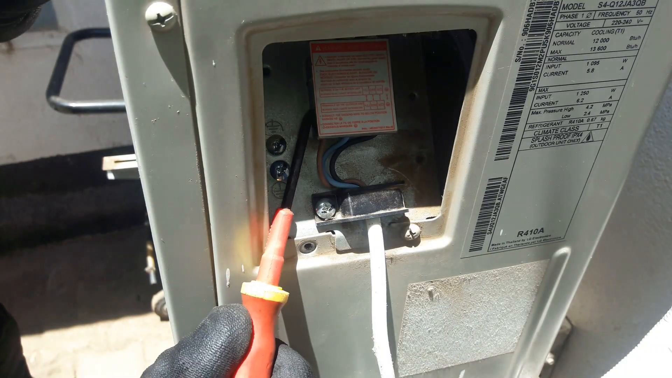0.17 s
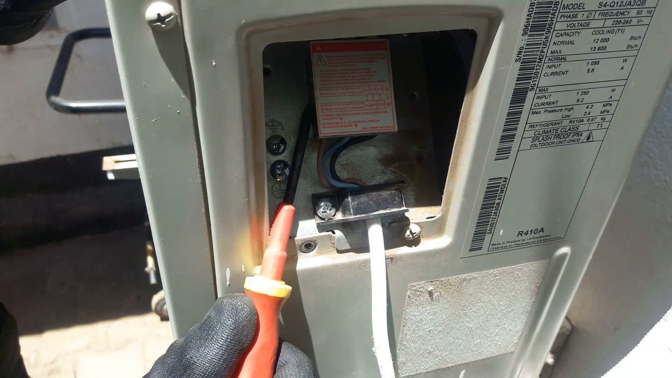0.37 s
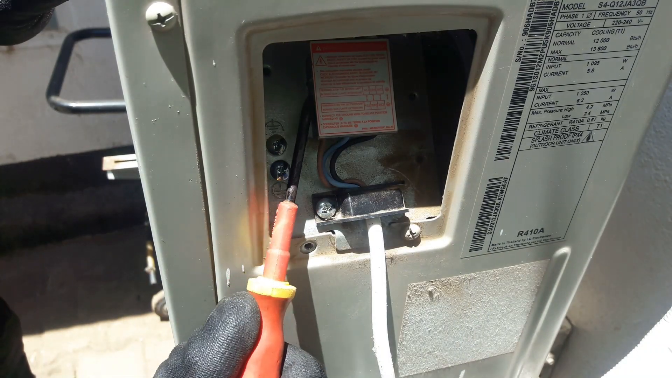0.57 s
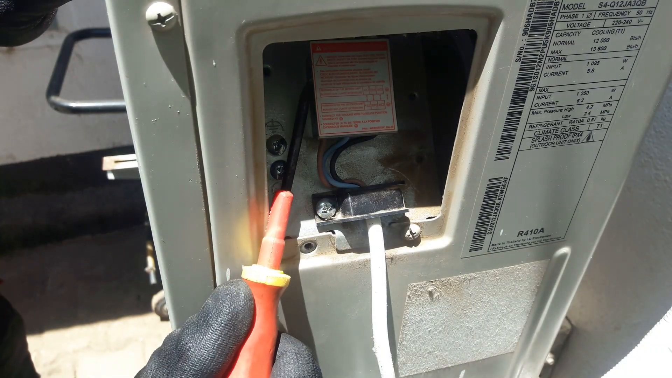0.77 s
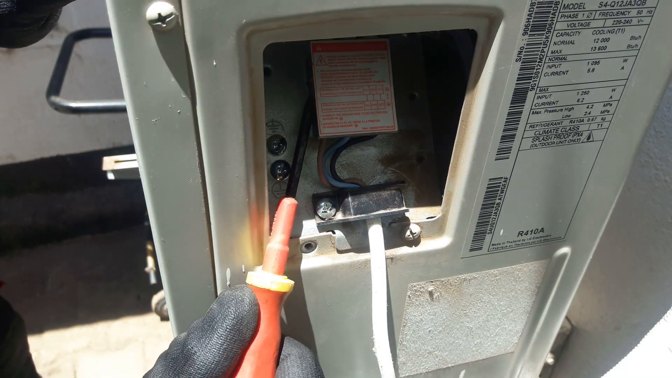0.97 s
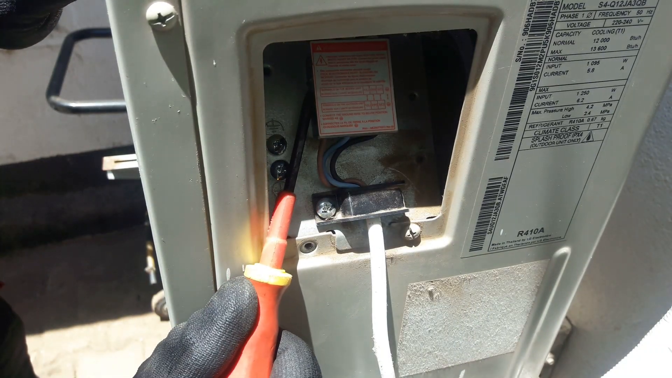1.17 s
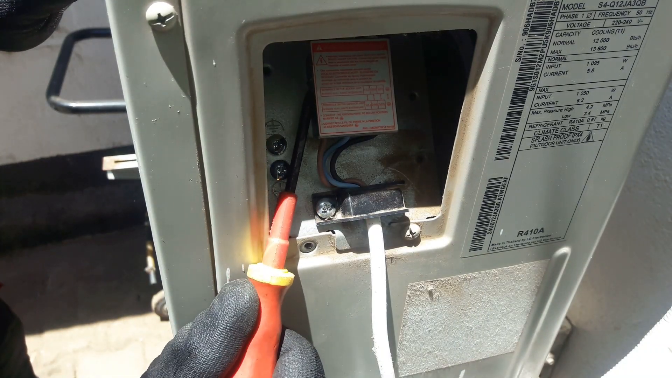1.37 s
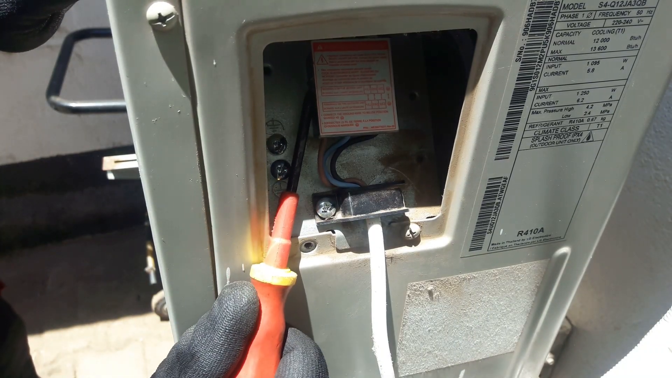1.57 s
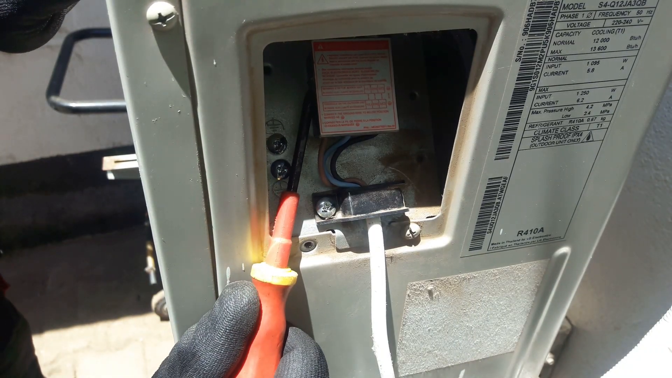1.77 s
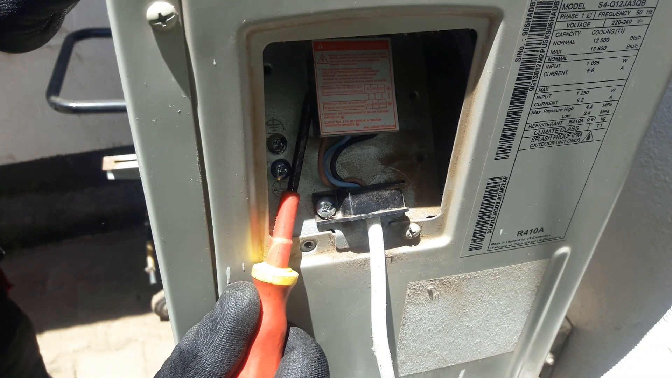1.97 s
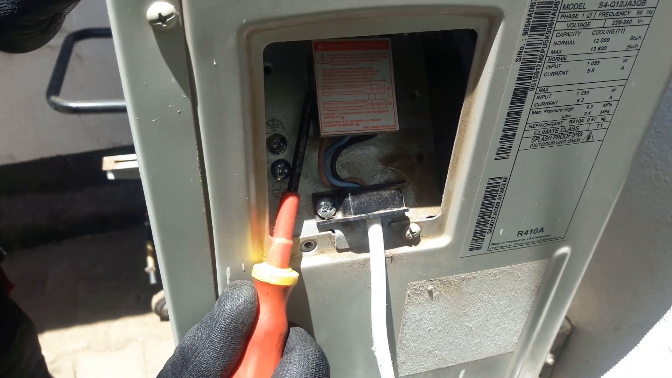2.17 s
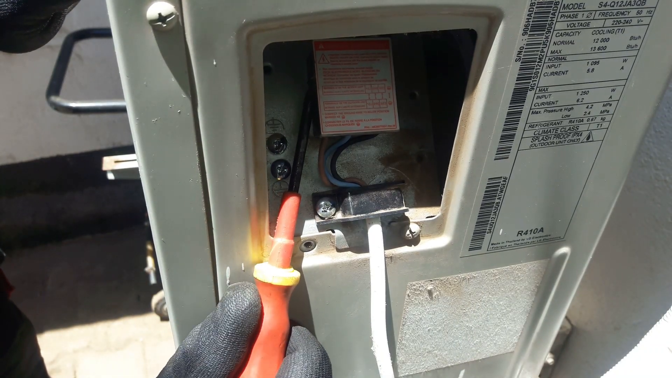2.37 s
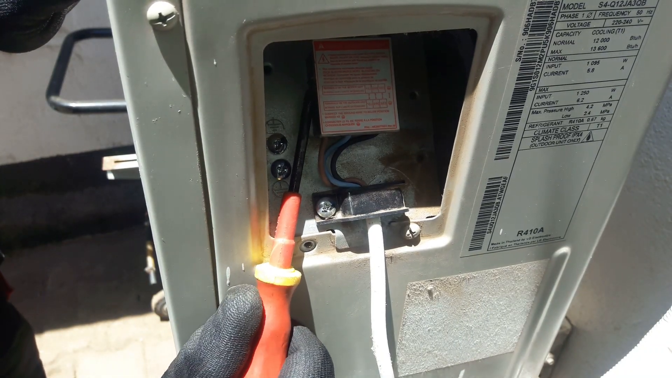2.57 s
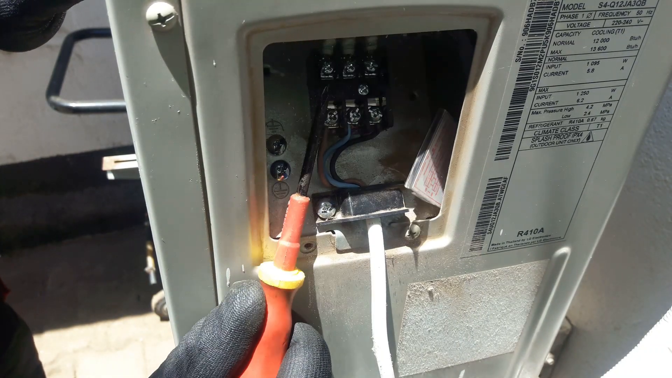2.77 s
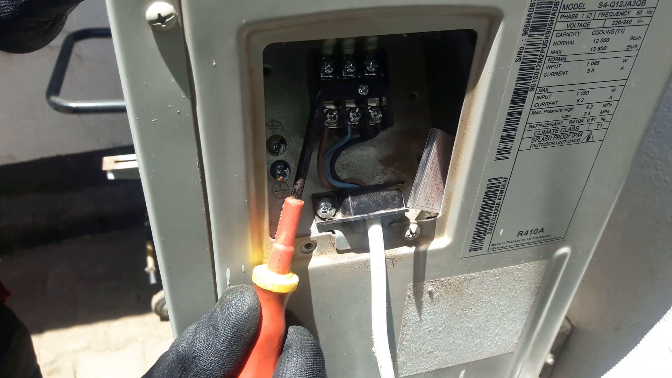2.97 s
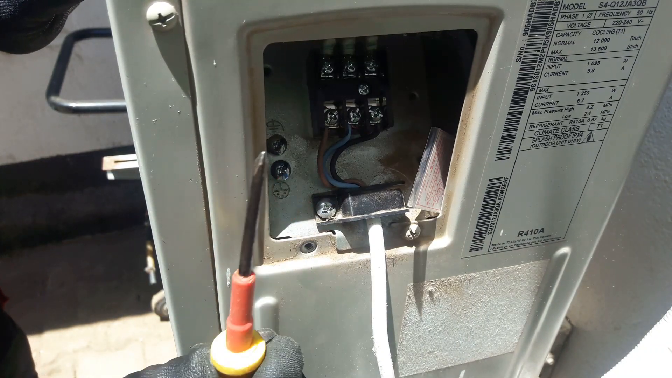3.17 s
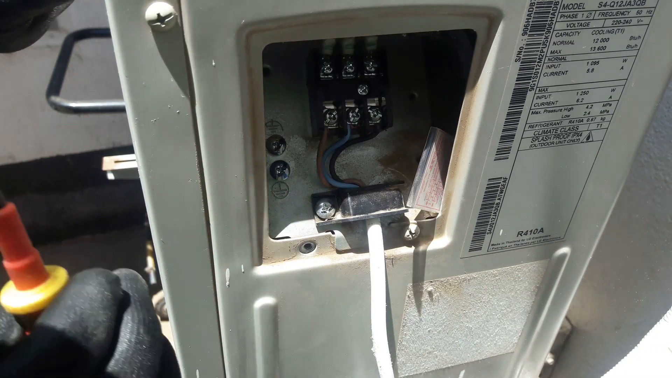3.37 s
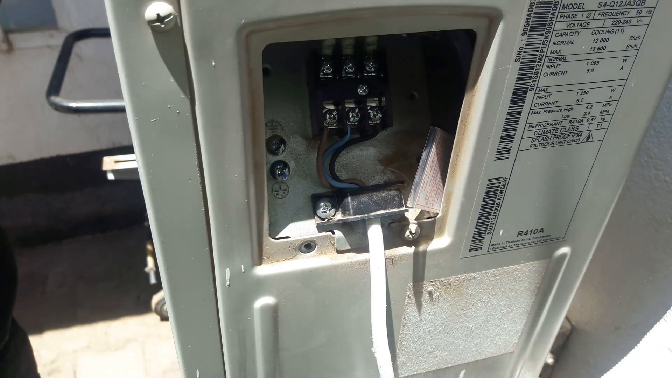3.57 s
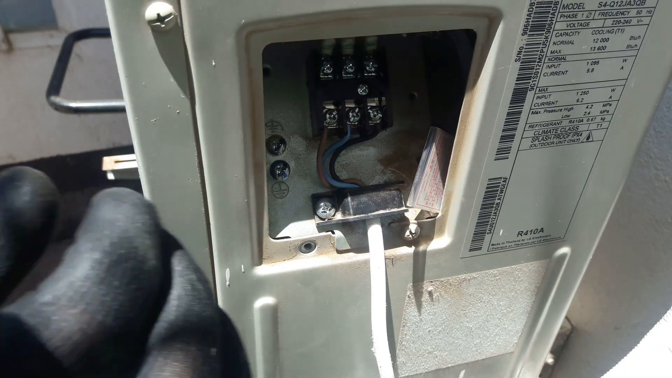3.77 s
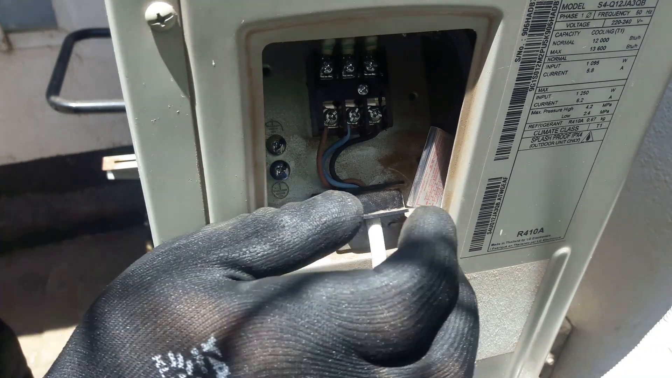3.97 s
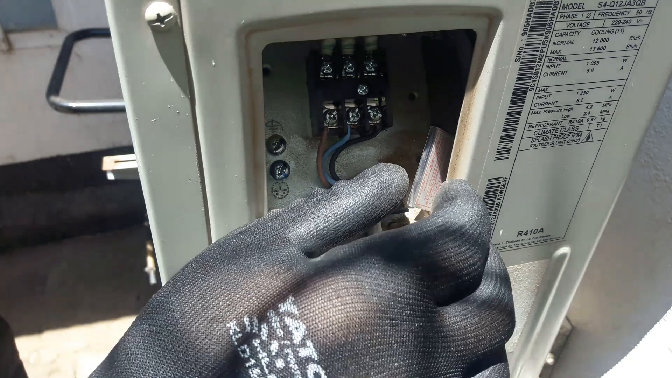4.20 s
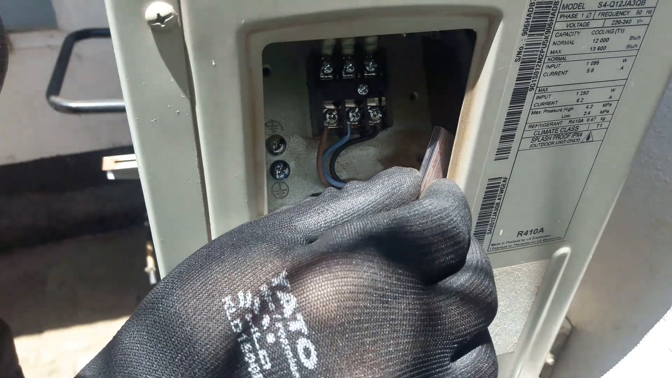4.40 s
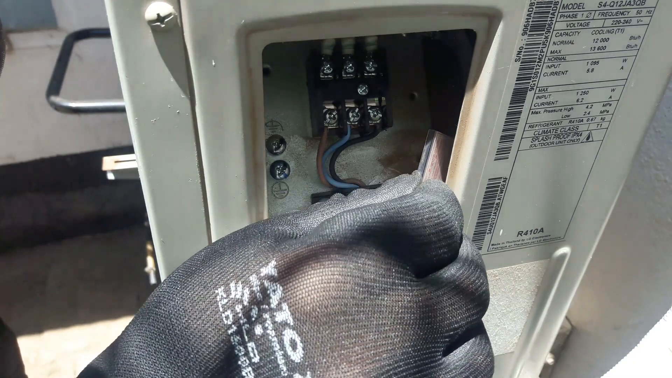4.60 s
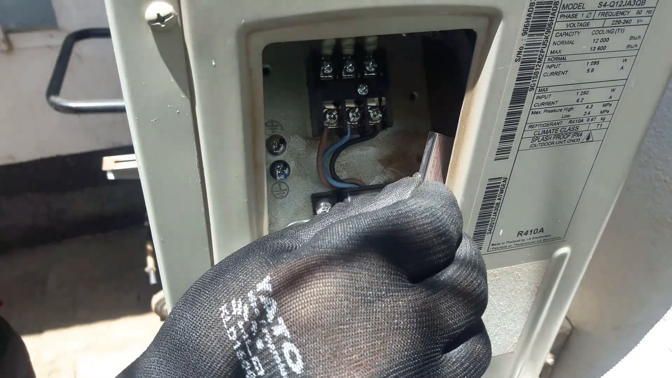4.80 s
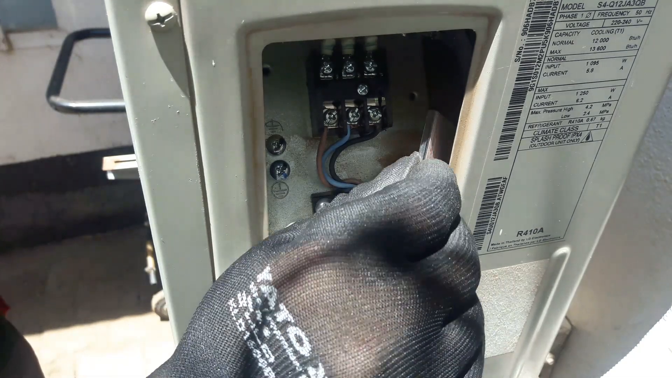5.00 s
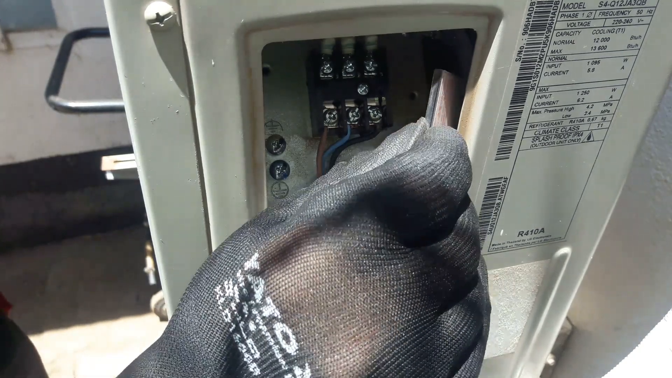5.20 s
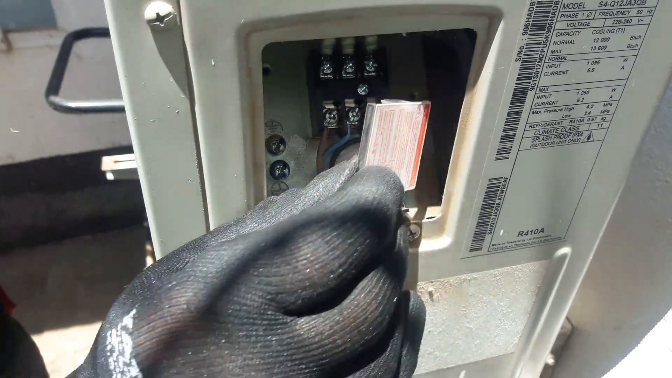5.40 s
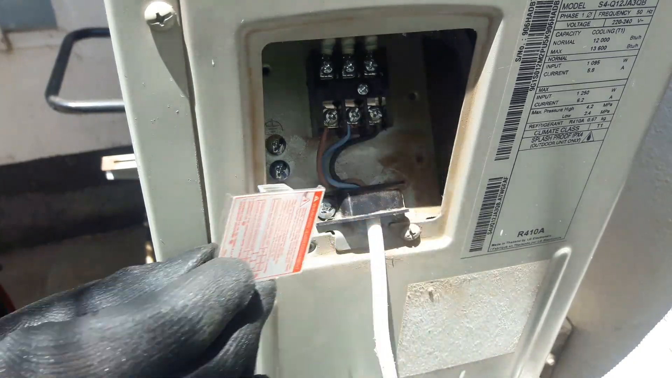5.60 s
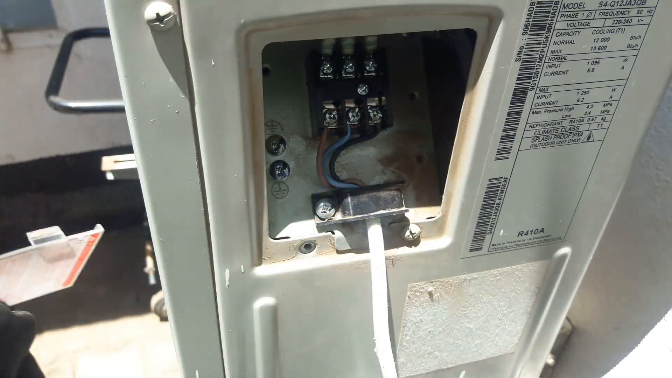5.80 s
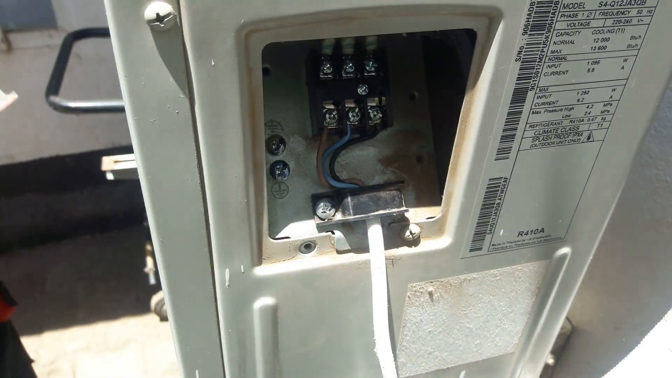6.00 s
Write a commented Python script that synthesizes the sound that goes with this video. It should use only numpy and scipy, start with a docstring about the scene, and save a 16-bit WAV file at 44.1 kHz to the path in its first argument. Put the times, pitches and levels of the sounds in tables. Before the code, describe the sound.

An outdoor air conditioner hums and blows close to the microphone, with a thin high whine. A screwdriver ticks and knocks lightly in its terminal box while faint bird chirps sound far off. After a short hiss, a stiff card snaps free and clatters against the metal cabinet. The hum dips for about a second and returns, then a glove rustles faintly.

```python
"""Prying at an air conditioner

A close outdoor unit hums, blows and whines while a screwdriver ticks and knocks at a stiff card in its
terminal box. After a short hiss the card snaps free and clatters against the sheet-metal cabinet;
gain control ducks the hum for about a second. A glove picks the card out. Faint chirps sound far off."""
import sys
import numpy as np
from scipy import signal
from scipy.fft import rfft, irfft, next_fast_len
from scipy.io import wavfile
from scipy.ndimage import minimum_filter1d

SR = 44100
rng = np.random.default_rng(int(sys.argv[2]) if len(sys.argv) > 2 else 0)


def wav_record(signal):
    """Record a signal, one row per channel, as 16-bit PCM in the file named by sys.argv[1]."""
    frames = np.transpose(np.atleast_2d(signal))
    bounded = np.clip(frames, -1, 1)
    # unit amplitude maps onto the largest positive 16-bit level
    quanta = np.round(bounded * 32767).astype(np.int16)
    wavfile.write(sys.argv[1], SR, quanta)


N = 266805
TIME_S = np.arange(N) / SR
HIT_SAMPLES, FFT_SAMPLES = 16384, 2 * next_fast_len(N // 2 + 1, True)

# compressor harmonics: (shaft multiple, level [dB])
SHAFT_ORDERS = [(1, -48.5), (2, -40.5), (3, -48.5), (6, -60.5), (7, -57)]
# panel booms: (middle [s], length [s], rise [dB])
PANEL_BOOMS = [(1.446, 0.54, 6), (2.35, 0.34, 5), (4.464, .36, 7.5)]
# fan and motor lines: (frequency [Hz], level [dB], waver [0-1], left-right [dB])
MOTOR_TONES = [(88.8, -55.5, 0.65, -3), (120.8, -50.5, 0.4, -3.5), (179, -52.5, 0.7, -6.5),
               (191.7, -55, 0.6, -5.5), (238, -56, 0.3, -13.5), (302, -51, 0.91, -6.5),
               (371, -53.5, 0.49, 9.5), (534.5, -53, 0.6, 0), (858, -61.5, 0.54, -15.5),
               (1088, -60, 0.4, -3), (1355, -64, 0.4, -4), (1685, -69.5, 0.4, -12), (3137, -71, 0.24, 12)]
# air spectrum, low and high parts: (frequency [Hz], relative density [dB])
RUSH_LOW = [(20, -22), (55, -7.5), (85, -12), (130, 1.5), (180, -1.5), (270, -6.5), (305, -9), (335, -14.5),
            (390, -10), (590, -6.5)]
RUSH_HIGH = [(950, -14), (1500, -16.5), (1900, -21), (2600, -24.5), (3200, -26), (3800, -31), (4700, -34.5),
             (7600, -36.5), (8300, -41), (8900, -46), (10200, -49), (12100, -43.5), (13700, -49.5),
             (16000, -46.5)]
# air balance: (frequency [Hz], left-right [dB])
RUSH_BALANCE = [(60, -1.5), (200, -0.5), (450, -0.5), (760, -4), (1100, 0), (2700, -1), (4000, -1),
                (7000, -2.5), (9500, 3.5), (15000, 0)]
# colouring of the air by the near glove: (frequency [Hz], gain [dB])
GLOVE_COLOUR = [(100, 0), (190, -2.5), (400, 0), (800, -0.5), (1200, -0.5), (1900, 2.5), (3000, 0),
                (5500, 1), (9000, 0.5), (12500, 1.5)]
# lower and upper inverter tone: (level [dB], left-right [dB])
WHINE_LEVELS = [(-73, -9), (-67, 0)]
# lean toward the lower (-) or upper (+) tone: (time [s], lean [dB])
WHINE_LEAN = [(0, -0.5), (1.2, -5), (1.8, 1), (2.5, 2.5), (3.95, 0.5), (4.3, 7), (4.95, 0.5), (6.05, 2)]
# card snap and rebounds: (time [s], crack level [dB], panel push [dB], tilt [dB/octave])
CARD_SNAPS = [(2.6921, -15, -5.5, 0.5), (2.6961, -28, -1.5, -4), (2.7027, -20.5, -5.5, -0.8),
              (2.7155, -35, -20, 1), (2.7267, -29, -6.5, -2), (2.7350, -23, -6, -7),
              (2.7415, -25.5, -9.5, -1), (2.7608, -36, -16.5, 1)]
# crack in the box: (frequency [Hz], relative density [dB], t60 [s])
CRACK_BANDS = [(70, -29, .15), (170, 4, .21), (450, -0.5, 0.35), (900, 0, 0.3), (1940, -1, 0.17),
               (3240, -9.5, 0.21), (3960, -12.5, 0.21), (5500, -13.5, 0.13), (7940, -7, 0.093),
               (9650, -21, 0.067), (12600, -18, 0.1), (16000, -18, .07)]
# cabinet panel, card, screwdriver on the box: (frequency [Hz], relative level [dB], t60 [s])
PANEL_MODES = [(131.7, -11, 0.63), (187, 4.5, 0.2), (253, -5, 0.15), (305, -28, .2), (380, -20, 0.23),
               (412, -10, 0.14), (499, 0, 0.11), (586, -8.5, 0.21), (710, 0.5, 0.17), (1070, -19, 0.16),
               (1270, -15, .14), (1504, -5, 0.11), (3210, -4, 0.08), (3490, -12, 0.11), (4807, -14, 0.15)]
CARD_MODES = [(1470, -1, 0.042), (2250, 0.5, 0.033), (3340, -6.5, 0.039), (4750, -6.5, 0.05),
              (5340, -10, 0.036), (5840, -2.5, 0.038), (6960, -7.5, 0.039), (7400, -11, .035)]
STEEL_MODES = [(1408, -1, 0.1), (1583, 2, 0.038), (1980, -7, 0.045), (3030, 1, 0.039), (3360, -10.5, 0.075),
               (4200, -31, 0.034)]
# card settles, later taps the box on its way out: (time [s], level [dB])
CARD_TAPS = [(2.729, -24), (2.761, -29.5), (2.7709, -44), (2.8141, -35), (2.8205, -49), (2.867, -45.5),
             (2.878, -49), (5.044, -46), (5.2421, -53)]
# tip in the box: (time [s], level [dB], centre [Hz], width [octaves])
TIP_TICKS = [(.1218, -35, 2740, 0.73), (.143, -38, 1200, .7), (0.2652, -40.5, 1700, 1.1),
             (0.5861, -38, 2200, 0.98), (.895, -32, 2200, 0.94), (1.078, -33.5, 4140, 1.6),
             (3.1648, -48, 6000, 1.2), (3.1952, -40, 5500, 0.62)]
# tool on the cabinet: (time [s], clack level [dB], clack centre [Hz], thud level [dB])
TOOL_KNOCKS = [(.055, -32.5, 513, -33), (0.2096, -30.5, 845, -26), (0.98, -37, 1100, -32),
               (1.748, -30.5, 1110, -25)]
# tip on the card: (time [s], level [dB], t60 [s])
TIP_SCRATCHES = [(.695, -57, .06), (.845, -59, .3), (.976, -63, .07), (1.3704, -55, .03)]
# hiss spectrum: (frequency [Hz], relative density [dB], t60 [s])
HISS_BANDS = [(1500, -1, 0.54), (3500, -1, 0.48), (6500, -1, 0.34), (10000, -5, 0.21), (12500, -3, 0.14),
              (14500, 5, .07), (16000, -3, .06)]
# glove on card and box: (middle [s], length [s], level [dB])
GLOVE_STROKES = [(4.052, 0.097, -59), (4.185, 0.077, -59), (4.922, 0.53, -66), (5.13, .14, -63),
                 (5.35, .3, -70), (6.04, .14, -61)]
# far chirps: (time [s], length [s])
FAR_CHIRPS = [(1.24, .12), (1.46, 0.17), (1.72, .09), (2.358, 0.12)]
# likeness of the two microphones: (frequency [Hz], coherence [clipped to +-1 in use])
MIC_COHERENCE = [(120, 1), (145, 0.97), (220, 1), (330, 1.5), (640, 0.2), (1410, -0.16), (3100, 0.02),
                 (15000, 0)]


def compressor(shaft_hz=50.74, waver=0.024, sway_db=1.0):
    """Shaft harmonics; the second sways and booms in the panels."""
    boom_db = sum(db * arch(s, length_s) for s, length_s, db in PANEL_BOOMS)
    boom = amp(boom_db + sway_db * jitter(4))
    out = np.zeros(N)
    for order, db in SHAFT_ORDERS:
        carrier = np.exp(2j * np.pi * (order * shaft_hz * TIME_S + rng.random()))
        line = (carrier * (1 + waver * wander(9.1))).real
        out += np.sqrt(2) * amp(db) * (boom if order == 2 else 1) * line
    return out * pan(-1.5)


def fan_motor(waver_hz=5.8):
    """Wavering fan and motor tones; the higher ones reach the microphones out of phase."""
    out = np.zeros((2, N))
    for hz, db, waver, side_db in MOTOR_TONES:
        envelope = unit(1 + waver * np.sqrt(2) * wander(waver_hz))
        line = envelope * np.exp(2j * np.pi * (hz * TIME_S + rng.random()))
        lag_rad = np.arccos(coherence(hz))
        out += np.sqrt(2) * amp(db) * pan(side_db) * np.array([line, line * np.exp(1j * lag_rad)]).real
    return out


def fan_air(level_db=-38.5, drift_db=-0.04, flutter_db=0.74, reach_at_s=2.9, reach_s=0.79):
    """Turbulence through the grille, fluttering as eddies pass; the nearing glove colours it."""
    hz, spectra = mic_noise(FFT_SAMPLES)
    spectra *= amp(lookup(RUSH_LOW + RUSH_HIGH, hz) + np.array([[.5], [-.5]]) * lookup(RUSH_BALANCE, hz))
    free = irfft(spectra)[:, :N]
    gloved = irfft(spectra * amp(lookup(GLOVE_COLOUR, hz)))[:, :N]
    nearness = np.clip((TIME_S - reach_at_s) / reach_s, 0, 1)
    air = unit(free + nearness * (gloved - free))
    return air * amp(level_db + drift_db * jitter(2.2) + flutter_db * jitter(25))


def inverter(tones_hz=(7284, 7644), waver=0.34):
    """Two thin electronic whines; one grows as the other fades."""
    lean_db = np.interp(TIME_S, *np.transpose(WHINE_LEAN))
    out = np.zeros((2, N))
    for hz, (db, side_db), sign in zip(tones_hz, WHINE_LEVELS, (-1, 1)):
        envelopes = np.array([unit(1 + waver * wander(19)) for _ in range(2)])
        quadrature = np.exp(2j * np.pi * hz * TIME_S) * np.array([[1], [1j]])
        out += np.sqrt(2) * amp(db + sign * lean_db) * pan(side_db) * (envelopes * quadrature).real
    return out


def card(panel_db=-22, scrape_db=-3):
    """Each blow cracks in the box and rings the panel; the loose card then chatters."""
    out = np.zeros((2, N))
    panel, card_ring = ring(PANEL_MODES), ring(CARD_MODES)
    attack = 1 + 0.74 * decay(0.024)
    for s, db, push_db, tilt_db in CARD_SNAPS:
        crack = burst([(hz, band_db + tilt_db * np.log2(hz), t60_s) for hz, band_db, t60_s in CRACK_BANDS])
        add(out, s, amp(db) * crack * attack + amp(panel_db + push_db) * panel)
    for s, db in CARD_TAPS:
        scrape = tap(centre_hz=2460, width_oct=0.94, t60_s=0.11)
        add(out, s, amp(db) * (card_ring + amp(scrape_db) * scrape))
    return out * pan(-0.85)


def screwdriver(tick_ping_db=-4, knock_ping_db=-17, thud_lag_s=0.00404):
    """Ticks ping the steel shaft; knocks clack, then thud in the cabinet; scratches are thin and high."""
    out, steel = np.zeros((2, N)), ring(STEEL_MODES)
    for s, db, centre_hz, width_oct in TIP_TICKS:
        t60_s = 0.032 * (2500 / centre_hz) ** 0.68  # brighter dies sooner
        add(out, s, amp(db) * (tap(centre_hz, width_oct, t60_s) + amp(tick_ping_db) * steel))
    for s, clack_db, centre_hz, thud_db in TOOL_KNOCKS:
        clack = tap(centre_hz, width_oct=0.8, t60_s=0.12)
        add(out, s, amp(clack_db) * (clack + amp(knock_ping_db) * steel))
        add(out, s + thud_lag_s, amp(thud_db) * tap(centre_hz=222, width_oct=1.0, t60_s=0.16))
    for s, db, t60_s in TIP_SCRATCHES:
        add(out, s, amp(db) * tap(centre_hz=12700, width_oct=0.4, t60_s=t60_s))
    return out


def hiss(peak_s=2.18, level_db=-39, swell_db=-52):
    """One short bright hiss that swells, then darkens as it dies."""
    out = np.zeros((2, N))
    swell = tap(centre_hz=9000, width_oct=1.0, t60_s=0.19)[:, ::-1]
    add(out, peak_s - HIT_SAMPLES / SR, amp(swell_db) * swell)
    add(out, peak_s, amp(level_db) * burst(HISS_BANDS))
    return out


def glove(centre_hz=11000, width_oct=0.95, grain_db=3, grain_hz=70):
    """Knitted fibres catch and slip in clumps; each stroke swells and fades."""
    hz, spectra = mic_noise(FFT_SAMPLES)
    friction = irfft(spectra * band(hz, centre_hz, width_oct))[:, :N]
    fibres = unit(friction * amp(grain_db * jitter(grain_hz)))
    return fibres * sum(amp(db) * arch(s, length_s) for s, length_s, db in GLOVE_STROKES)


def chirps(from_hz=6480, to_hz=7300, peak_db=-64):
    """Faint rising sine glides, as of a far bird."""
    out = np.zeros((2, N))
    for s, length_s in FAR_CHIRPS:
        hz = np.linspace(from_hz, to_hz, int(length_s * SR))
        cycles = np.cumsum(hz) / SR + rng.random((2, 1))
        add(out, s, amp(peak_db) * np.hanning(len(hz)) * np.sin(2 * np.pi * cycles))
    return out


def ring(modes):
    """Struck modes; the higher ones reach the microphones out of phase."""
    out = np.zeros((2, HIT_SAMPLES))
    for hz, db, t60_s in modes:
        phase_rad = np.arccos(coherence(hz)) * np.array([[.5], [-.5]])
        out += amp(db) * decay(t60_s) * np.sin(2 * np.pi * hz * TIME_S[:HIT_SAMPLES] + phase_rad)
    return out


def burst(bands):
    """Noise whose bands each build in half a cycle and die at their own rate."""
    hz, spectra = mic_noise(HIT_SAMPLES)
    spectra *= unit(amp(lookup(bands, hz)))
    log_centres = np.log([row[0] for row in bands])
    out = np.zeros((2, HIT_SAMPLES))
    for (centre_hz, _, t60_s), selector in zip(bands, np.eye(len(bands))):
        share = np.interp(np.log(hz + 1), log_centres, selector)
        out += irfft(spectra * share) * decay(t60_s) * onset(0.5 / centre_hz)
    return out


def tap(centre_hz, width_oct, t60_s):
    """Light contact in one noise band; duller starts softer."""
    hz, spectra = mic_noise(HIT_SAMPLES)
    return irfft(spectra * unit(band(hz, centre_hz, width_oct))) * decay(t60_s) * onset(1 / centre_hz)


def mic_noise(samples, direct=0.21, delay_s=0.000376):
    """Frequencies and stereo noise spectra: alike in the bass, a small direct part later on the right."""
    hz = np.fft.rfftfreq(samples, 1 / SR)
    left, diffuse = rfft(rng.standard_normal((2, samples)))
    same, share = coherence(hz), direct * hz / (hz + 500)
    apart = np.sqrt(1 - share ** 2) * diffuse + share * left * np.exp(-2j * np.pi * hz * delay_s)
    return hz, np.array([left, same * left + np.sqrt(1 - same ** 2) * apart])


def coherence(hz):
    """Microphone likeness, -1 to 1."""
    return np.clip(lookup(MIC_COHERENCE, hz), -1, 1)


def wander(rate_hz, points=2048):
    """Slow complex noise, rms 1."""
    hz = np.fft.fftfreq(points, N / SR / points)
    slow = unit(np.fft.ifft(np.exp(2j * np.pi * rng.random(points) - (hz / rate_hz) ** 2)))
    return np.interp(TIME_S, np.linspace(0, TIME_S[-1], points), slow)


def jitter(rate_hz):
    """Slow real noise, rms 1."""
    return unit(wander(rate_hz).real)


def decay(t60_s):
    """Exponential fall."""
    return np.exp(-np.log(1000) * TIME_S[:HIT_SAMPLES] / t60_s)


def onset(rise_s):
    """Smooth start."""
    return 1 - np.exp(-(TIME_S[:HIT_SAMPLES] / rise_s) ** 2)


def arch(middle_s, length_s):
    """Smooth rise to 1 and back."""
    return np.cos(np.pi * np.clip((TIME_S - middle_s) / length_s, -.5, .5)) ** 2


def band(hz, centre_hz, width_oct):
    """Gain of one broad band."""
    return (1 + (np.log2((hz + 1) / centre_hz) / width_oct) ** 2 / 3) ** -3


def lookup(table, hz):
    """Second column, interpolated over log frequency."""
    rows = np.array(table, float)
    return np.interp(np.log(hz + 1), np.log(rows[:, 0] + 1), rows[:, 1])


def amp(db):
    """Decibels to gain."""
    return 10 ** (np.asarray(db) / 20)


def unit(x):
    """Scales to rms 1."""
    return x / np.sqrt(np.mean(abs(x) ** 2) + 1e-20)


def pan(side_db):
    """Left and right gains."""
    return amp([[side_db / 2], [-side_db / 2]])


def add(mix, s, sound):
    """Mixes a stereo sound in at time s."""
    part = mix[:, round(s * SR):][:, :sound.shape[1]]
    part += sound[:, :part.shape[1]]


def scene():
    """Running machine, work at its terminal box, a hiss, far chirps."""
    machine = compressor() + fan_motor() + inverter() + fan_air()
    return machine + card() + screwdriver() + hiss() + glove() + chirps()


def record(dry, threshold_db=-24, max_cut_db=12, hold_s=1.007, recover_db_per_s=55, smooth_s=0.15):
    """Low cut; gain control ducks on a loud sound, holds, recovers; soft overload; band limit."""
    low_hz, high_hz, ceiling = 38, 15780, 0.88
    dry = signal.sosfilt(signal.butter(4, low_hz, "high", fs=SR, output="sos"), dry)
    power = signal.lfilter([1 / 400], [1, 1 / 400 - 1], (dry ** 2).mean(0))  # 9 ms average
    demand_db = np.clip(2 * (10 * np.log10(power + 1e-12) - threshold_db), 0, max_cut_db)
    half_hold = int(hold_s * SR) // 2
    held_db = -minimum_filter1d(-demand_db, 2 * half_hold + 1, origin=half_hold, mode="constant")
    ramp_db = TIME_S * recover_db_per_s
    cut_db = np.maximum.accumulate(held_db + ramp_db) - ramp_db
    pole = np.exp(-1 / (smooth_s * SR))
    ducked = dry / amp(signal.lfilter([1 - pole], [1, -pole], cut_db))
    saturated = ceiling * np.tanh(ducked / ceiling)
    lowpass = signal.firwin(801, high_hz, window=("kaiser", 9), fs=SR)
    return signal.oaconvolve(saturated, lowpass[None], "same")


dry = scene()
out = record(dry)
wav_record(out)
```